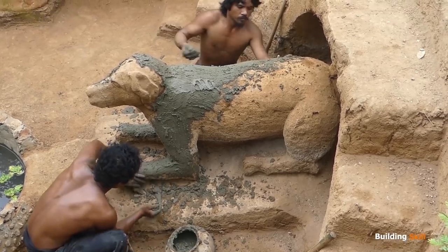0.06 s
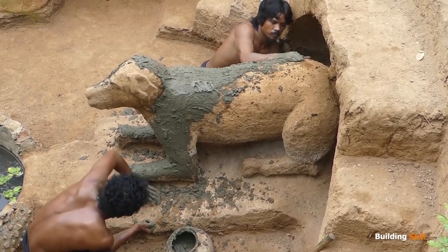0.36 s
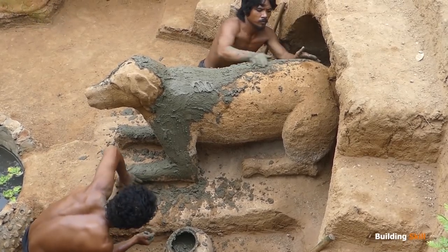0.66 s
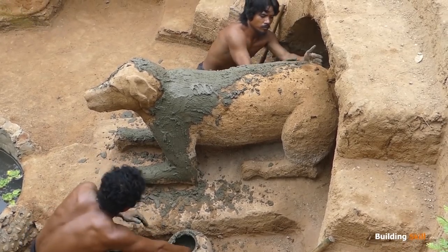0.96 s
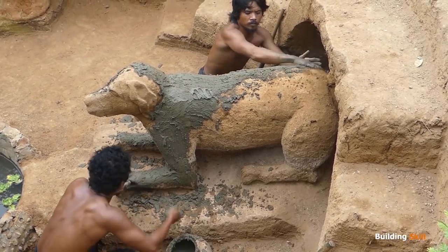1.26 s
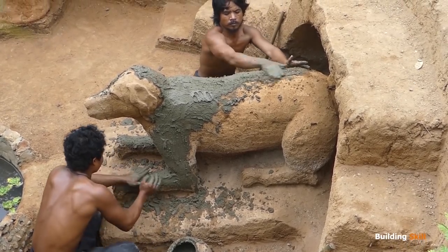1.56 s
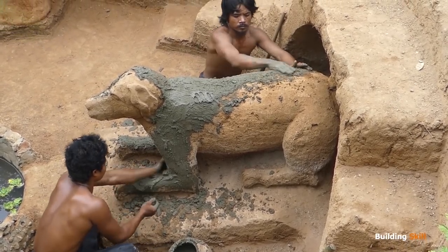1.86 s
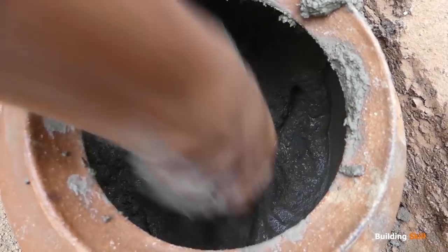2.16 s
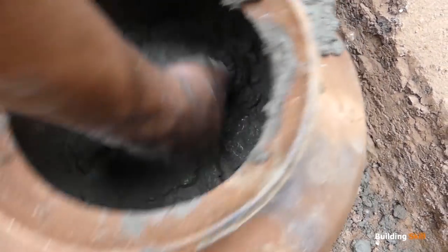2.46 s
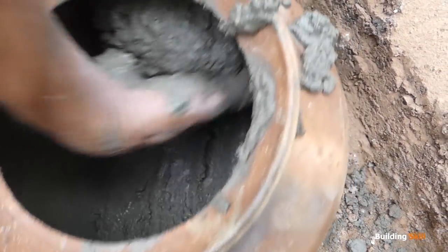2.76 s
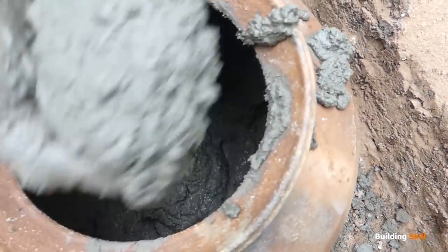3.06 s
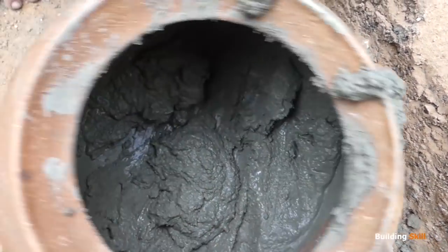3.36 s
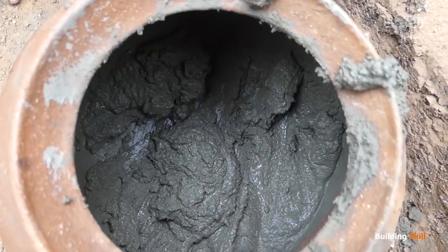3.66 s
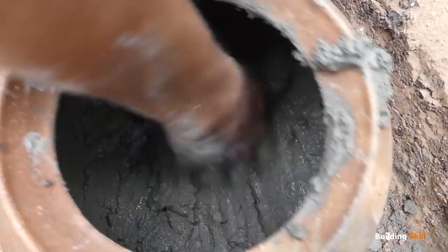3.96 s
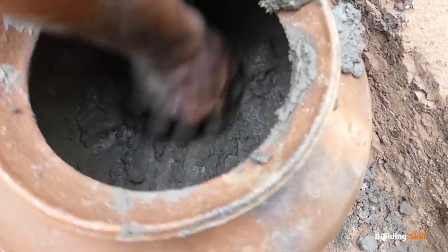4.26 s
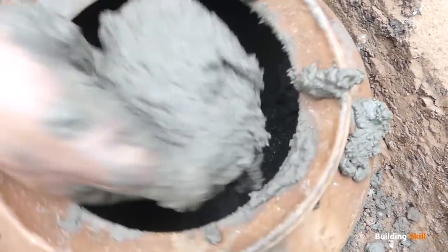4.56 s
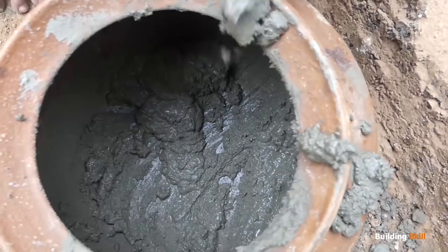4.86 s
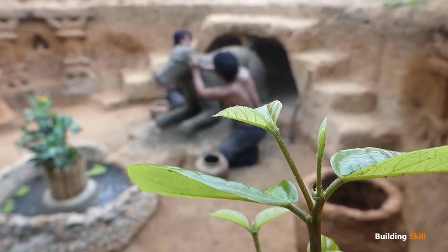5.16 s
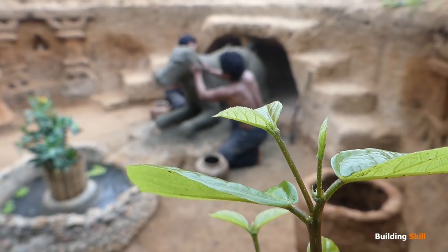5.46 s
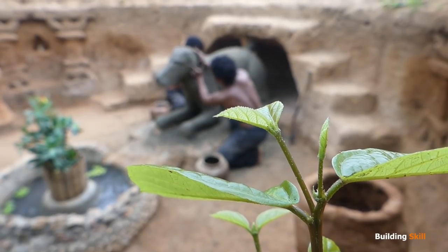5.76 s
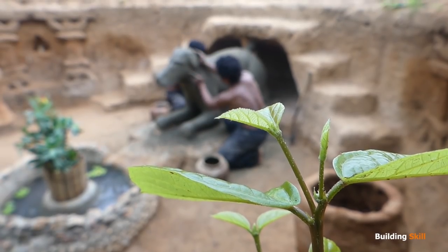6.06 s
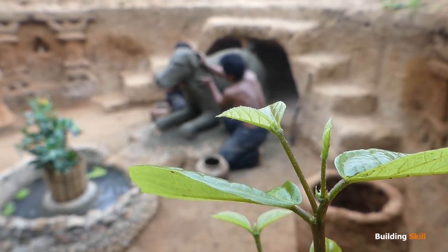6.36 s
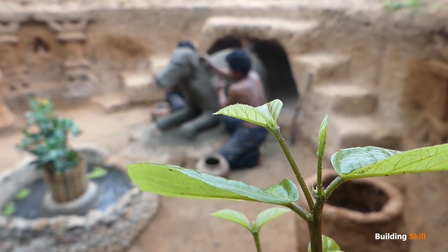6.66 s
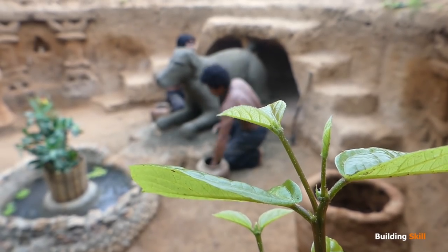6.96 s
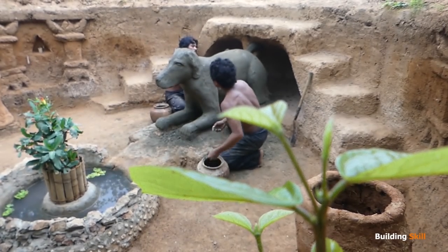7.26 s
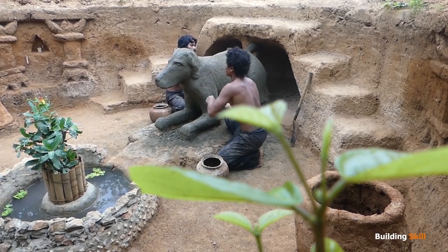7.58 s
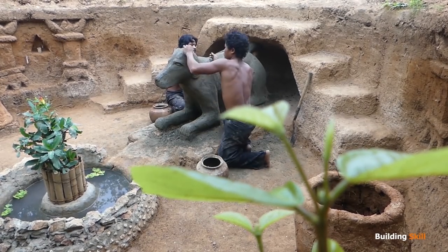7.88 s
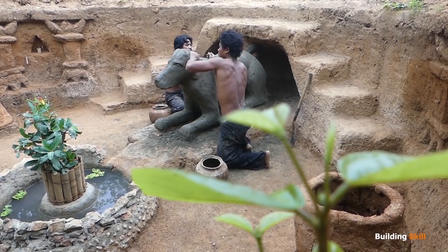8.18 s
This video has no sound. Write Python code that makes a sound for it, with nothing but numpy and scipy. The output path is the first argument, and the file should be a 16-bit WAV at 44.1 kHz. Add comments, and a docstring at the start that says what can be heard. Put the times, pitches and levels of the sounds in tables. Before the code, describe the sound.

Faint rubbing of palms on wet mortar, then a hand scrapes and squelches in a clay pot, lumps plop, and the soft smearing resumes.

```python
"""Two people plaster a clay figure with wet mortar in an earthen yard. First palms smear a few metres
away, with a hiss of friction and a few short clicks. From 2.2 s to 5 s a hand close by twice scoops
mortar from a clay pot: sand rasps on the wall, the enclosed air resonates, slurry squelches and suction
pockets snap; between the scoops lumps land with a plop. Then the smearing resumes, with light pats. Near
7 s the pot is heard from afar and a distant bird hoots, while a low rumble grows under the outdoor air."""
import sys
import numpy as np
from scipy import signal
from scipy.fft import rfft, irfft
from scipy.io import wavfile
from scipy.ndimage import uniform_filter1d

SR = 44100
rng = np.random.default_rng(int(sys.argv[2]) if len(sys.argv) > 2 else 0)


def file_out(sig):
    """Save sig as 16-bit WAV at sys.argv[1]."""
    # one column per channel
    cols = np.atleast_2d(sig).T
    # limit, then scale
    lim = np.clip(cols, -1, 1)
    pcm = np.round(lim * 32767).astype(np.int16)
    wavfile.write(sys.argv[1], SR, pcm)


N = 362502
TIME = np.arange(N) / SR

# Pushes of the hand through the mortar, two scoops in all:
# t/s, rise/s, length/s, hiss level/dB, rasp level/dB, f of the hollow under the hand/Hz, hum level/dB
PUSHES = [(2.2602, 0.0036, 0.025, -32, -27, 4120, -39), (2.287, 0.026, 0.039, -23, -22, 2430, -40.5),
          (2.408, 0.0028, 0.026, -25, -24, 4000, -41.5), (2.466, 0.019, 0.044, -24.5, -30, 3100, -41.5),
          (2.52, 0.01, 0.04, -39, -35.5, 2780, -60), (2.572, 0.04, 0.038, -20.5, -16.5, 2250, -63),
          (2.619, 0.011, 0.066, -32.5, -29, 2800, -38), (2.688, 0.02, 0.098, -28.5, -36, 3300, -46.5),
          (2.796, .02, 0.085, -44, -37.5, 2410, -55), (2.933, 0.063, 0.027, -37, -26.5, 2620, -51),
          (3.039, 0.013, 0.014, -32, -30.5, 3040, -72), (3.17, 0.0085, 0.0098, -38.5, -44, 2880, -54),
          (3.988, 0.032, 0.027, -20.5, -24, 3500, -37.5), (4.027, 0.0088, 0.039, -31.5, -42.5, 3770, -56),
          (4.098, 0.053, 0.054, -27, -35.5, 3830, -61), (4.15, 0.022, 0.032, -21, -20, 2530, -44),
          (4.19, .012, .04, -42, -40.5, 3600, -55.5), (4.256, 0.01, 0.029, -34, -35.5, 3000, -67),
          (4.279, 0.012, 0.045, -21, -23, 2360, -40.5), (4.334, 0.015, 0.068, -24.5, -47.5, 3170, -45.5),
          (4.398, 0.019, 0.042, -23, -22.5, 3930, -57.5), (4.455, 0.0081, 0.043, -35.5, -42, 3800, -53.5),
          (4.659, 0.018, 0.051, -56, -39.5, 2600, -66), (4.72, 0.017, 0.14, -49, -48.5, 3200, -74),
          (4.827, 0.024, 0.027, -58, -52, 2300, -51)]
HISS, RASP, HOLLOW, HUM = 3, 4, 5, 6  # column numbers


def push_gains(column, release_db_per_s=533.5, linger_db=-25, linger_db_per_s=126):
    """Friction sounds while the hand moves; then most sand stops and a few grains slide on."""
    gains, t = np.zeros((len(PUSHES), N)), np.arange(SR // 2) / SR
    for gain, row in zip(gains, PUSHES):
        start, rise, length = row[:3]
        after = np.maximum(t - length, 0)
        release = np.maximum(amp(-release_db_per_s * after), amp(linger_db - linger_db_per_s * after))
        add(gain, start, amp(row[column]) * np.minimum(t / rise, 1) * release)
    return gains


# Spectrum of sand sliding on clay: f/Hz, level/dB
SAND_SPECTRUM = [(60, -35.5), (200, -21), (380, -10.5), (700, -9.5), (1250, -14), (2000, -4.5), (4000, -2),
                 (7000, 0), (10000, -2), (13500, -6), (16000, -13.5)]
# Wet mortar creeping and settling in the pot: t/s, level/dB
CREEP_LEVEL = [(2.85, -55.5), (3.1, -42.5), (3.23, -54), (3.372, -53), (3.51, -46.5), (3.63, -48),
               (3.66, -52), (3.98, -59), (4.55, -52), (4.68, -49.5), (4.822, -50.5), (4.93, -50),
               (5.1, -55.5)]


def scooping(rasp_db=-6, hollow_width_hz=1200, rim_db=-10):
    """Granular friction: sand hisses on the wall, rasps in the hand's resonant hollow, and creeps."""
    rasp_gains = push_gains(RASP)
    share = rasp_gains + 1e-9
    hollow_hz = np.array(PUSHES)[:, HOLLOW] @ share / share.sum(0)  # the strongest push dominates
    sand = colour(grains(per_s=11000, spread_db=0.5, clump_db=1), SAND_SPECTRUM)
    hiss = low_cut(patchy(pot_modes(sand, ring_db=-33), depth_db=3), hz=110)
    slips = pot_modes(grains(per_s=9000, spread_db=0.5, clump_db=2.5), ring_db=-2)
    rasp = resonate_twice(slips, hollow_hz, hollow_width_hz)
    rasp = evened(low_cut(low_cut(rasp, hz=1050), hz=1050))
    ooze = patchy(colour(grains(per_s=23000, spread_db=0, clump_db=3.5), SAND_SPECTRUM), depth_db=4.5)
    drag = power_sum(push_gains(HISS))
    creep = amp(np.interp(TIME, *np.transpose(CREEP_LEVEL), left=-np.inf, right=-np.inf))
    direct = hiss * drag + amp(rasp_db) * rasp * power_sum(rasp_gains) + ooze * creep
    rim_reflections = amp(rim_db) * (drag + creep) * colour(noise(N), SAND_SPECTRUM)
    return widen(direct, rim_reflections, ECHO_WIDTH)


# Modes of the air in the pot: f/Hz, bandwidth/Hz, level/dB
POT_MODES = [(1010, 40, 7), (1623, 20, 7), (2040, 210, 0), (2230, 60, -2), (3067, 36, -14), (3600, 35, 8),
             (3880, 100, 5)]


def pot_modes(x, ring_db):
    """Cavity resonance: the pot's air modes ring along with any sound inside."""
    return x + amp(ring_db) * sum(amp(db) * resonate(x, hz, width) for hz, width, db in POT_MODES)


# The mouth resonance, which sinks as a scoop is lifted into the opening: t/s, f/Hz
MOUTH_PITCH = [(2.65, 495.4), (2.78, 476), (2.95, 426), (4.0, 472), (4.42, 473), (4.6, 422), (4.85, 462)]


def pot_hum(width_hz=13, mouth_db=1.5, overtone_hz=1635, overtone_db=-6, ring_s=0.0032, boom_db=-7):
    """Forced resonance: scraping drives the air in the pot's mouth, with a faint overtone, over the broad
    hollow boom of its belly."""
    stirring = np.roll(power_sum(push_gains(HUM)), -SR // 200)  # 5 ms ahead of the pushes
    fade = np.exp(-1 / (ring_s * SR))
    swell = signal.lfilter([1 - fade], [1, -fade], stirring)
    out = amp(boom_db) * evened(resonate_twice(noise(N), hz=680, width_hz=420))
    mouth_hz = np.interp(TIME, *np.transpose(MOUTH_PITCH))
    for hz, db in [(mouth_hz, mouth_db), (overtone_hz, overtone_db)]:
        mode = resonate_twice(noise(N), hz, width_hz)
        running_rms = np.sqrt(abs(uniform_filter1d(mode ** 2, size=1200)) + 1e-12)
        out += amp(db) * mode / running_rms
    return out * swell


# Suction pockets opening in the pot: t/s, level/dB, f/Hz, relative crackle level/dB
SUCTION_SNAPS = [(2.204, -30, 2050, 7), (2.904, -20, 9050, -16), (3.053, -14, 3460, -12),
                 (3.371, -26, 2120, -9), (3.408, -19, 9800, -10), (2.727, -11, 7060, 1),
                 (4.112, -19.5, 8150, 8), (4.185, -3.5, 5100, -2), (4.293, -11, 3240, 9),
                 (4.5125, -10.5, 1930, -1), (4.5408, 1, 2500, -21.5), (4.674, -29, 6500, 12),
                 (4.791, -19.5, 2360, 10), (4.8032, -9, 2350, 1), (4.8385, -12, 2300, 3),
                 (4.889, -21, 7450, 4), (5.0757, -11.5, 4630, -2)]


def suction_snaps():
    """Impulse excitation: a suction pocket breaks open and its pop rings the pot's modes."""
    pops = bursts(SUCTION_SNAPS, damping=0.83, bright_db=-4.5, lead=0.35, cut_ratio=0.32, decay_s=0.0047)
    return pot_modes(amp(0.5) * low_cut(pops, hz=1400), ring_db=-5)


def bursts(rows, damping, bright_db, lead, cut_ratio, decay_s):
    """Damped oscillation: one short pulse inside a crackle that builds quickly and dies away."""
    out, t = np.zeros(N), np.arange(-SR // 60, SR // 12) / SR
    for s, db, hz, crackle_db, *_ in rows:
        decay = decay_s / np.sqrt(hz / 1000)  # decay_s holds at 1 kHz; higher bursts die sooner
        fizz = noise(len(t)) * np.exp(-np.maximum(t / decay, -t / (lead * decay)))
        cycles = hz * np.maximum(t, 0)
        pulse = np.sin(2 * np.pi * cycles) * np.exp(-damping * cycles)
        body = resonate(fizz, hz, hz / 2) * np.sqrt(SR / hz / np.pi)
        crackle = amp(crackle_db) * (body + amp(bright_db) * fizz)
        pop = low_cut(pulse + crackle, cut_ratio * hz)  # the higher the burst, the less bass
        add(out, s + t[0], amp(db) * pop / (np.max(pulse) + 2 * amp(crackle_db)))
    return out


# Air and slurry squeezed between the fingers: t/s, level/dB, f/Hz, half-width/s, glide/(octaves/s)
FINGER_SQUELCHES = [(2.212, -49, 970, 0.0065, -4), (2.32, -33, 2230, 0.0099, 4),
                    (2.416, -20.5, 3990, 0.0036, -22), (2.425, -21.5, 3060, 0.0032, 2),
                    (2.441, -22.5, 3100, .0035, 5), (2.605, -24.5, 1980, 0.014, -5),
                    (2.87, -46, 2200, 0.01, -9), (4.092, -52, 3660, .025, -4), (4.322, -25, 2080, 0.01, 0),
                    (4.43, -33, 1850, 0.0066, 9), (4.449, -26.5, 4400, .007, 19)]


def squelches(width_hz=260):
    """Flow noise in a resonant gap: brief fuzzy whistles glide as the gap closes or opens."""
    out, t = np.zeros(N), np.arange(-SR // 12, SR // 12) / SR
    for s, db, hz, half_width, glide in FINGER_SQUELCHES:
        swell = np.exp(-(t / half_width) ** 2 / 2)
        whistle = swell * resonate_twice(noise(len(t)), hz * 2 ** (glide * t), width_hz)
        add(out, s + t[0], amp(db) * whistle * np.linalg.norm(swell) / np.linalg.norm(whistle))
    return out


def bubbles(low_hz=1600, high_hz=9000, pitches=24, per_s=260, cycles=14, spread_db=6.5, relative_db=-11):
    """Bubble resonance: tiny air pockets pop at random during the pushes, each at its own pitch."""
    out, t = np.zeros(N), np.arange(SR // 30) / SR
    size = amp(spread_db * np.minimum(rng.exponential(1, N), 4)) * (rng.random(N) < per_s / SR)
    pocket = rng.integers(0, pitches, N)
    pops = [np.sin(2 * np.pi * hz * t) * np.exp(-hz * t / cycles) * (1 - np.exp(-hz * t))
            for hz in np.geomspace(low_hz, high_hz, pitches)]
    for k in np.flatnonzero(size):
        add(out, k / SR, size[k] * pops[pocket[k]])
    return amp(relative_db) * evened(low_cut(out, hz=910)) * power_sum(push_gains(HISS))


# Soft blows of the hand inside the pot: t/s, thud level/dB, ring level/dB, ring f/Hz
HAND_BLOWS = [(2.203, -62, -34, 487), (2.569, -32, -29, 475), (3.37, -21.5, -30, 490),
              (3.984, -27.5, -47, 297), (4.543, -22, -21.5, 430), (4.892, -24.5, -29.5, 449)]


def thumps(thud_hz=210, heavy_db=-25, db_per_octave=55, thud_t60=0.022, ring_t60=0.1, rise_s=0.0013,
           overshoot=0.48, yield_s=0.007, click_ring_ratio=0.775):
    """Inelastic impact: a blow thuds, deeper when heavier, and rings the hollow beside it."""
    out, t = np.zeros(N), np.arange(SR // 4) / SR
    # each slap, click or tick also has a faint thud and ring
    under_clicks = [(s, thud, ring, click_ring_ratio * hz) for s, _, hz, _, thud, ring in SHORT_CLICKS]
    for s, thud_db, ring_db, ring_hz in HAND_BLOWS + under_clicks:
        hz = thud_hz * 2 ** ((heavy_db - thud_db) / db_per_octave)
        cycles = np.cumsum(hz * (1 + overshoot * np.exp(-t / yield_s))) / SR  # the pitch drops quickly
        thud = amp(thud_db - 60 * t / thud_t60) * np.sin(2 * np.pi * cycles)
        ring = amp(ring_db - 60 * t / ring_t60) * np.sin(2 * np.pi * ring_hz * t)
        add(out, s, (thud + ring) * (1 - np.exp(-t / rise_s)))
    return low_cut(out, hz=175)


# Lumps landing close by: t/s, knock level/dB, knock f/Hz, smack level/dB, smack f/Hz,
# spray level/dB, spray decay/s, squeezed air level/dB, thud level/dB
LUMPS = [(3.4356, -17, 740, -12.5, 2130, -27, 0.014, -47, -46),
         (3.557, -36, 790, -25.5, 1630, -40.5, 0.039, -31, -43),
         (3.745, -18.5, 773, -15, 3000, -28, 0.015, -30.5, -44),
         (3.892, -47, 880, -34.5, 1790, -35, 0.0096, -34.5, -55)]
# Modes of the hollow under a lump: f/Hz, bandwidth/Hz, level/dB
LUMP_MODES = [(650, 70, -1), (920, 61, -4)]
# Spectrum of squeezed air and flying grit: f/Hz, level/dB
SPRAY_SPECTRUM = [(150, -9), (700, -5.5), (10000, -4.5), (16000, -7.5)]


def plops(thud_hz=250, crack_db=-9, squeeze_s=0.0063):
    """Impact on an air cushion: a lump expels the air, lands with a knock and smack, and sprays grit."""
    out, t = np.zeros(N), np.arange(-SR // 20, SR // 7) / SR
    for s, knock_db, knock_hz, smack_db, smack_hz, spray_db, spray_s, squeeze_db, thud_db in LUMPS:
        knock = amp(knock_db) * puff(t, peak_s=0.00079) * np.sin(2 * np.pi * knock_hz * t)
        hollow = sum(amp(db) * resonate(knock, hz, width) for hz, width, db in LUMP_MODES)
        smack = amp(smack_db) * puff(t, peak_s=0.00035) * np.sin(2 * np.pi * smack_hz * t)
        thud = amp(thud_db) * puff(t, peak_s=0.0039) * np.sin(2 * np.pi * thud_hz * t)
        squeeze = amp(squeeze_db) * np.exp(-abs(t) / squeeze_s)
        spray = amp(spray_db) * np.exp(-abs(t) / spray_s)
        crack = amp(smack_db + crack_db) * puff(t, peak_s=0.00055)
        grit = colour(noise(len(t)), SPRAY_SPECTRUM) * (np.where(t < 0, squeeze, spray) + crack)
        add(out, s + t[0], knock + hollow + smack + thud + grit)
    return low_cut(out, hz=216)


# Short slaps, clicks and high ticks:
# t/s, level/dB, f/Hz, relative crackle level/dB, thud level/dB, ring level/dB
SHORT_CLICKS = [(.021, -36, 1860, -9, -54, -55), (1.223, -38, 690, -12.5, -42, -56),
                (1.974, -21, 8050, -27, -71, -75), (5.3968, -32.5, 6870, -16, -69, -72),
                (5.712, -35, 634, -30, -32, -53), (7.844, -36, 425, -22.5, -57, -42.5)]


def short_clicks(resonance_db=-2.5):
    """Damped transients: short slaps, clicks and high ticks, brightened by a broad resonance."""
    pops = bursts(SHORT_CLICKS, damping=0.95, bright_db=8, lead=0.21, cut_ratio=0.46, decay_s=0.0066)
    return pops + amp(resonance_db) * resonate(pops, hz=2200, width_hz=940)


# Strokes of the palms on the figure: t/s, length/s, level/dB
PALM_STROKES = [(0.223, 0.023, -56), (.24, 0.24, -61), (0.462, 0.16, -61.5), (0.728, 0.17, -52.5),
                (0.987, 0.14, -54), (1.215, 0.12, -56), (1.364, 0.14, -48.5), (1.523, 0.18, -50.5),
                (1.827, 0.14, -48.5), (5.102, 0.087, -43.5), (5.193, 0.13, -51), (5.408, 0.082, -50),
                (5.523, 0.29, -55), (5.813, 0.09, -52.5), (5.99, .1, -58), (6.163, 0.036, -53.5),
                (6.447, 0.038, -61), (6.579, .06, -62.5), (6.68, 0.04, -56.5), (7.07, 0.13, -55.5),
                (7.295, 0.14, -55), (7.52, 0.096, -53.5), (7.661, 0.077, -54.5), (7.73, 0.33, -60),
                (8.088, 0.11, -54.5)]
# Light, longer rubbing: t/s, length/s, level/dB
LIGHT_RUBS = [(0, 0.85, -69.5), (6.098, 0.69, -72)]
# Spectrum of mortar sliding under a palm: f/Hz, level/dB
SMEAR_SPECTRUM = [(100, -60), (450, 0.5), (1200, 0.5), (2600, -0.5), (3700, 1.5), (4500, 2), (5700, 2.5),
                  (14500, 5), (17000, -17)]


def smearing(arch=0.42, unsteady_db=1.4, gap_hz=5200, gap_octaves=0.37, gap_db=-3, side_db=-7):
    """Sliding friction: grit hisses with each stroke, coloured by the shifting gap under the palm."""
    strokes = sum(amp(db) * abs(np.sin(np.pi * np.clip((TIME - start) / length, 0, 1))) ** arch
                  for start, length, db in PALM_STROKES + LIGHT_RUBS)
    grit = patchy(colour(grains(per_s=16000, spread_db=-3.5, clump_db=0.5), SMEAR_SPECTRUM), depth_db=1)
    gap_pitch = gap_hz * 2 ** (gap_octaves * wander(hz=10.7))
    grit = evened(grit + amp(gap_db) * resonate(grit, gap_pitch, width_hz=1400))
    side = amp(side_db) * colour(noise(N), SMEAR_SPECTRUM)
    return amp(unsteady_db * wander(hz=18)) * strokes * widen(grit, side, ECHO_WIDTH)


def glancing_echo(x, delay_s=0.000562, echo_db=-11, until_s=2.5):
    """Comb filtering: an echo from a surface near the hands interferes with the first strokes."""
    echo = np.array([np.interp(TIME - delay_s, TIME, channel) for channel in x])
    return x + amp(echo_db) * echo * (TIME < until_s)


# The hand in the distant pot: t/s, scrape level/dB, scrape rise/s, ring level/dB, ring f/Hz
DISTANT_SCOOPS = [(6.917, -42, 0.0054, -29.5, 502), (7.02, -63, 0.021, -44, 480),
                  (7.061, -46.5, 0.011, -42, 502), (7.319, -45, 0.0062, -40, 958)]
# Spectrum of a distant scrape: f/Hz, level/dB
SCRAPE_SPECTRUM = [(150, -25.5), (500, 5), (1400, -8), (2300, 0), (3300, -2), (4000, -8.5), (7000, -6.5),
                   (16000, -15)]


def distant_scoops(ring_rise_s=0.0081, ring_gain_db=-3):
    """Friction drives a cavity: each short scrape in the distant pot stirs a hollow ring."""
    out, t = np.zeros(N), np.arange(SR // 5) / SR
    for s, db, rise_s, ring_db, ring_hz in DISTANT_SCOOPS:
        scrape = evened(pot_modes(colour(noise(len(t)), SCRAPE_SPECTRUM), ring_db=-6)) * puff(t, rise_s)
        ring = np.sin(2 * np.pi * ring_hz * t) * puff(t, ring_rise_s)
        add(out, s, amp(db) * scrape + amp(ring_db + ring_gain_db) * ring)
    return out


# Dull shuffling bumps: t/s, level/dB
SHUFFLES = [(4.11, -52), (5.28, -54), (5.465, -50.5)]


def bumps(half_width_s=0.0087):
    """Amplitude modulation: Gaussian swells of low noise give bumps without a hard edge."""
    swell = sum(amp(db) * np.exp(-np.minimum(abs(TIME - s) / half_width_s, 10) ** 2 / 2)
                for s, db in SHUFFLES)
    return swell * evened(low_cut(resonate_twice(noise(N), hz=300, width_hz=240), hz=140))


def bird(start_s=7.029, every_s=0.138, count=6, top_db=-47, loudest_s=7.4, swell_s=0.34, swell_db=5,
         first_hz=747, sag_hz_per_s=80, half_width_s=0.016, glide_hz_per_s=250):
    """Pure-tone pulses: an even run of hoots swells, fades and sinks in pitch; each lifts slightly."""
    out, t = np.zeros(N), np.arange(-SR // 10, SR // 10) / SR
    for s in start_s + every_s * np.arange(count):
        db = top_db - swell_db * ((s - loudest_s) / swell_s) ** 2
        hz = first_hz - sag_hz_per_s * (s - start_s)
        tone = np.sin(2 * np.pi * (hz + glide_hz_per_s * t / 2) * t)
        add(out, s + t[0], amp(db) * np.exp(-(t / half_width_s) ** 2) * tone)
    return out


# Background spectra before, during and after the close scooping: f/Hz, level/dB
EARLY_AIR = [(35, -54), (60, -23.5), (515, 0), (862, -1), (1060, -3.5), (2840, -12), (4420, -11.5),
             (7300, -12.5), (13300, -13), (16000, -20)]
MIDDLE_AIR = [(35, -33), (100, -15), (480, -3.5), (870, -3), (3000, -17.5), (16000, -22.5)]
LATE_AIR = [(35, -50), (60, -29), (108, -8), (227, -5.5), (350, 3), (621, -5.5), (862, -3), (1400, -11),
            (3850, -17.5), (12700, -19), (16000, -23.5)]
# Stereo width of the background until the scooping ends, and after: f/Hz, side over mid level/dB
AIR_WIDTH = [(60, 0), (300, 12), (650, 9.5), (870, 9.5), (1200, 10), (2700, 8), (7000, -3.5)]
LATE_AIR_WIDTH = [(100, -1), (350, 2.5), (620, 10.5), (870, 7.5), (1300, 8.5), (2700, 7.5), (7000, -2.5)]


def outdoor_air(middle_from_s=2.05, late_from_s=5.22, fade_s=0.02):
    """A diffuse field: noise arrives from all sides and shifts twice in colour, by equal-power fades."""
    past_early, late = np.clip((TIME - [[middle_from_s], [late_from_s]]) / fade_s, 0, 1)
    out = np.zeros((2, N))
    for spectrum, db, width, power in [(EARLY_AIR, -57, AIR_WIDTH, 1 - past_early),
                                       (MIDDLE_AIR, -57.5, AIR_WIDTH, past_early - late),
                                       (LATE_AIR, -56.5, LATE_AIR_WIDTH, late)]:
        mid, side = colour(noise(2, N), spectrum)
        out += amp(db) * widen(mid, side, width) * np.sqrt(power)
    return out


def drone(hz=865, width_hz=50, db=-67):
    """Narrow-band noise: a faint fuzzy tone hangs in the air of the yard."""
    return amp(db) * evened(resonate_twice(noise(N), hz, width_hz))


def rumble(end_db=-65, hz=125, width_hz=90, rise_db_per_s=9):
    """Exponential growth: low noise, partly shared by both ears, swells toward the end."""
    low = low_cut(resonate(resonate(noise(2, N), hz, width_hz), hz, width_hz), hz=83)
    return evened(low + low[::-1] / 2) * amp(end_db + rise_db_per_s * (TIME - TIME[-1]))


# Stereo width of reflected sound: f/Hz, side over mid level/dB
ECHO_WIDTH = [(200, -1), (1000, 0.5), (2000, 1.5), (9000, -2.5)]


def scatter(x, t60, wet_db):
    """Diffuse reflection: the direct sound plus a short decaying tail, different in each ear."""
    t = np.arange(SR // 3) / SR
    tail = widen(*noise(2, len(t)), ECHO_WIDTH) * amp(-60 * t / t60)
    tail *= amp(wet_db) / np.linalg.norm(tail, axis=1, keepdims=True)
    return x + signal.oaconvolve(np.atleast_2d(x), tail, axes=1)[:, :N]


def grains(per_s, spread_db, clump_db):
    """Shot noise: slipping sand grains make clicks of uneven size that come in clumps."""
    size = amp(spread_db * np.minimum(rng.exponential(1, N), 5) + clump_db * wander(hz=83))
    return evened(size * noise(N) * (rng.random(N) < per_s / SR))


def patchy(x, depth_db):
    """Time-varying filtering: shifting gaps under the fingers favour now one band, now another."""
    spectra = signal.stft(x, nperseg=256)[2]
    patches = uniform_filter1d(noise(*spectra.shape), size=4, axis=0)
    patches = evened(uniform_filter1d(patches, size=8, axis=1))
    return evened(signal.istft(spectra * amp(depth_db * patches), nperseg=256)[1][:N])


def resonate(x, hz, width_hz):
    """A damped resonator of gain 1 that can follow a pitch curve."""
    phasor = np.exp(2j * np.pi * np.cumsum(hz * np.ones(x.shape[-1])) / SR)
    pole = np.exp(-np.pi * width_hz / SR)
    return 2 * (phasor * signal.lfilter([1 - pole], [1, -pole], x / phasor + 1e-18)).real


def resonate_twice(x, hz, width_hz):
    """Resonators in cascade: a second, twice as wide, steepens the skirts of the band."""
    return resonate(resonate(x, hz, width_hz), hz, 2 * width_hz)


def low_cut(x, hz):
    """Second-order high-pass."""
    return signal.sosfilt(signal.butter(2, hz, "high", fs=SR, output="sos"), x)


def shaped(x, points):
    """Zero-phase filtering by a table of f/Hz, level/dB, read on a logarithmic frequency axis."""
    hz, db = np.transpose(points)
    bins_hz = np.fft.rfftfreq(x.shape[-1], 1 / SR)
    gain = amp(np.interp(np.log(bins_hz + 1), np.log(hz + 1), db))
    return irfft(rfft(x) * gain, x.shape[-1])


def colour(x, points):
    """Spectral shaping, at rms 1."""
    return evened(shaped(x, points))


def widen(mid, side, width):
    """Sum and difference: left and right from a middle and a filtered side signal."""
    return mid + np.array([[1], [-1]]) * shaped(side, width)


def noise(*shape):
    """White Gaussian noise."""
    return rng.standard_normal(shape)


def wander(hz):
    """Random fluctuation of rms 1, low-passed at hz."""
    return evened(irfft(rfft(noise(N)) / (1 + (np.fft.rfftfreq(N, 1 / SR) / hz) ** 4), N))


def puff(t, peak_s):
    """A critically damped envelope: starts at t = 0, reaches 1 at peak_s and dies away."""
    u = np.maximum(t, 0) / peak_s
    return u * np.exp(1 - u)


def power_sum(gains):
    """Incoherent addition: overlapping noises add in power."""
    return np.sqrt(np.sum(gains ** 2, axis=0))


def amp(db):
    """Decibels to gain."""
    return 10 ** (np.asarray(db) / 20)


def evened(x):
    """Normalisation to rms 1."""
    return x / np.sqrt(np.mean(x ** 2) + 1e-20)


def add(mix, s, sound):
    """Superposition: mixes a sound in at time s."""
    part = mix[..., max(round(s * SR), 0):][..., :sound.shape[-1]]
    part += sound[..., :part.shape[-1]]


def scene():
    """Superposition of the close pot, the far work on the figure, the bird and the air of the yard."""
    snaps = suction_snaps()
    clicks_and_plops = (short_clicks() + plops()) * amp([[-1.4], [1.4]])  # a little to the right
    near = scooping() + bubbles() + squelches() + pot_hum()
    near += scatter(snaps + clicks_and_plops, t60=0.023, wet_db=-5.5)
    near += scatter(thumps(), t60=0.13, wet_db=0)
    far = glancing_echo(smearing()) + scatter(bumps(), t60=0.11, wet_db=-3)
    far += scatter(distant_scoops(), t60=0.056, wet_db=-3.5) + bird()
    air = outdoor_air()
    return scatter(near, t60=0.095, wet_db=-15) + far + air + drone() + rumble()


def record(dry):
    """Clipping at full scale, then band limiting at 16.1 kHz."""
    low_pass = signal.firwin(511, 16100, window=("kaiser", 9), fs=SR)
    return signal.oaconvolve(np.clip(dry, -1, 1), low_pass[None], "same")


dry = scene()
out = record(dry)
file_out(out)
```